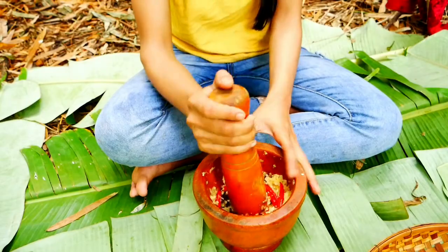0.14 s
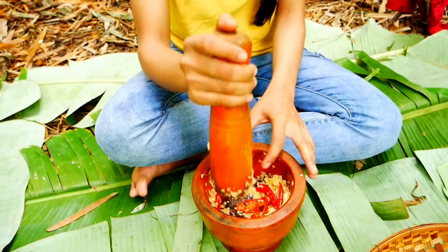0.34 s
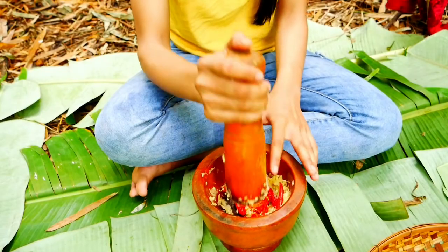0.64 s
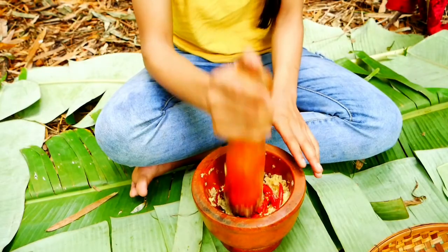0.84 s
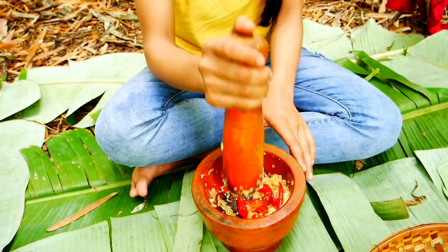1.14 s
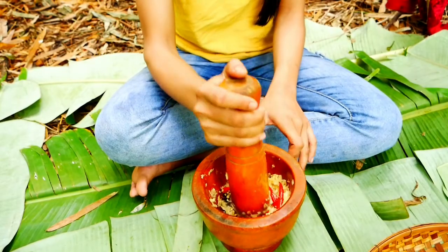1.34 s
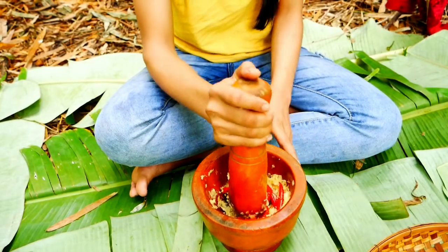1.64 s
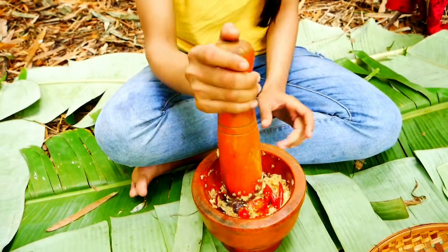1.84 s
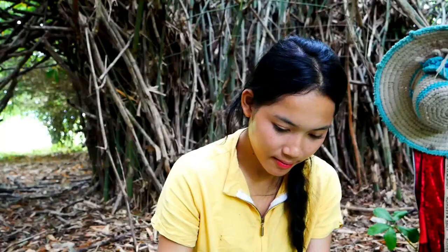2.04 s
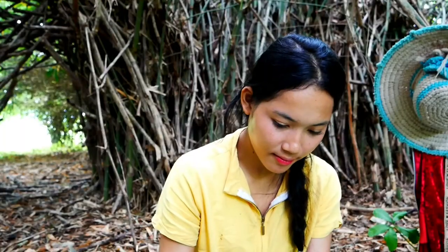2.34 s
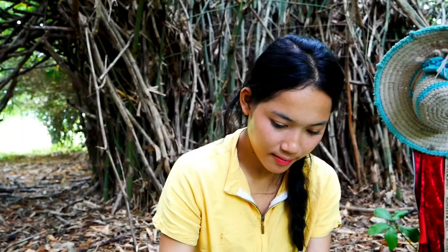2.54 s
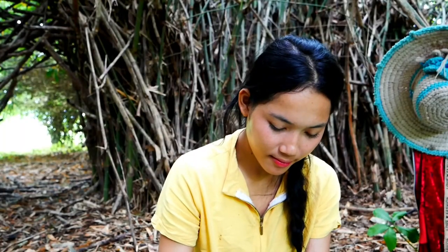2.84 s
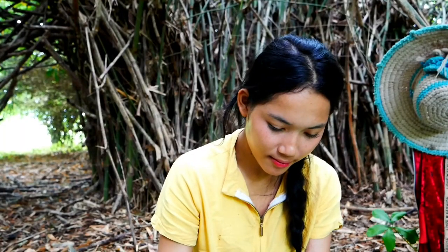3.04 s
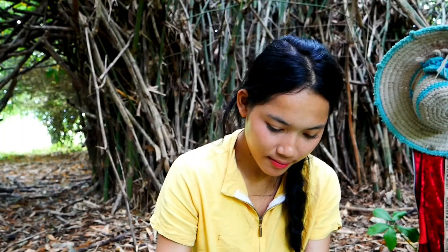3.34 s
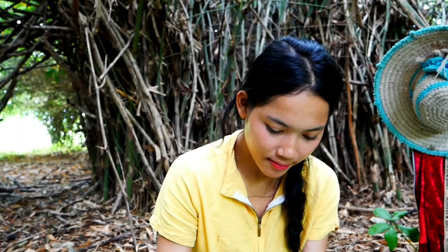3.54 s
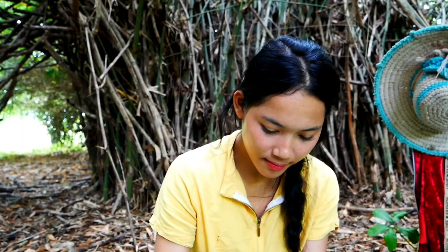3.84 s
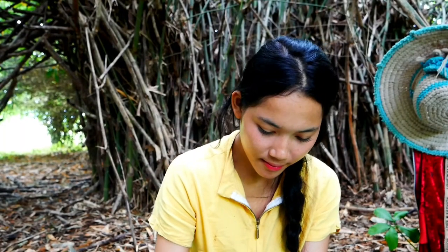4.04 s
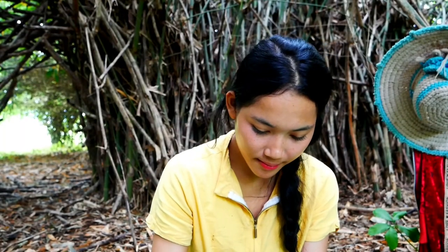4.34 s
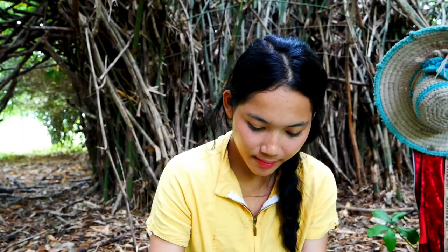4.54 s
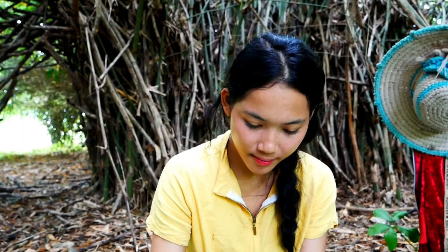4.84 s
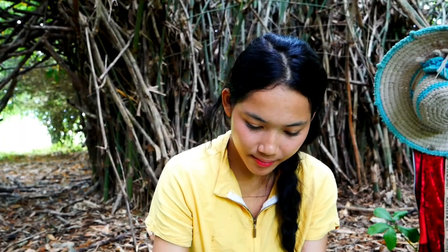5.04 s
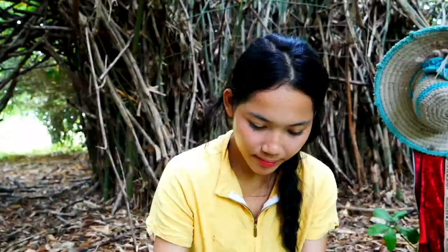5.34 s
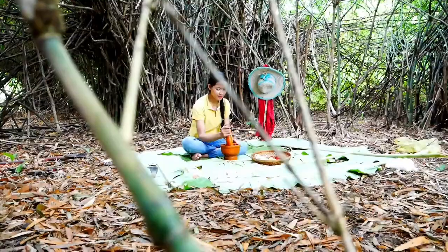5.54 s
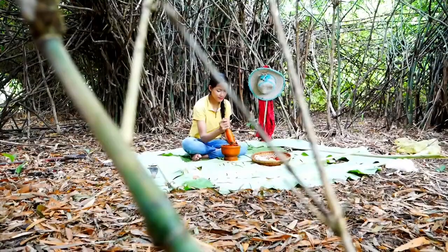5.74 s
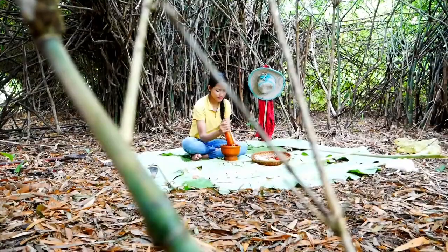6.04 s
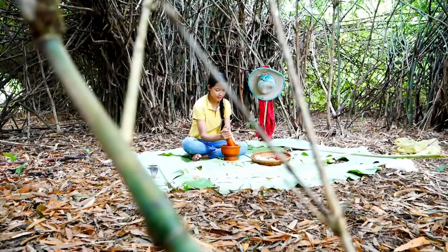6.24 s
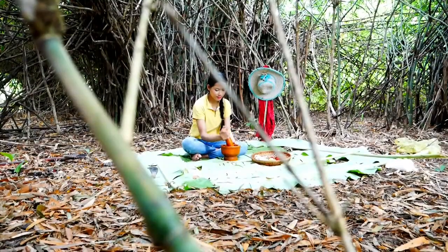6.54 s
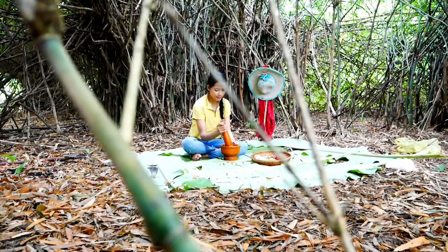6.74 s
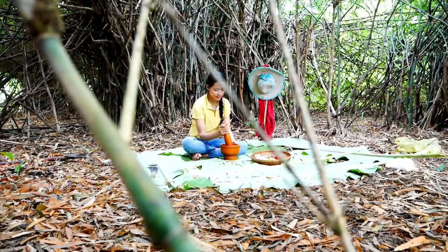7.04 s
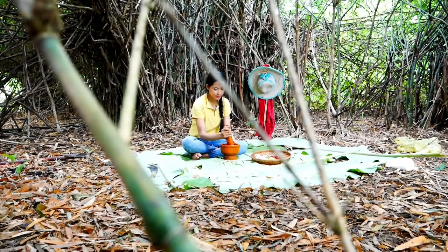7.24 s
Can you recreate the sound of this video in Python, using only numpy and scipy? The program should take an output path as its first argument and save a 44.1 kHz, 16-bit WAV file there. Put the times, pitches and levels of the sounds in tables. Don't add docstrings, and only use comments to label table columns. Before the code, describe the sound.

Close pounding of chilies in a clay mortar: soft uneven taps, then hard regular blows with little bounces, two ringing rim hits, quiet breeze.

```python
import sys
import numpy as np
from scipy import signal
from scipy.fft import rfft, irfft, next_fast_len
from scipy.io import wavfile
from scipy.ndimage import uniform_filter1d, minimum_filter1d

SR = 44100
rng = np.random.default_rng(int(sys.argv[2]) if len(sys.argv) > 2 else 0)


def gain_from_decibels(decibels):
    exponent = np.asarray(decibels, float) / 20
    return 10 ** exponent


def log_audio(samples):
    frames = np.atleast_2d(samples).T
    limited = np.clip(frames, -1, 1)
    pcm = np.round(limited * 32767).astype(np.int16)
    wavfile.write(sys.argv[1], SR, pcm)


N = 325889
LN2 = np.log(2)

# (time [s], thud level [dB], pitch [Hz], contact half-length [ms], clay wall level [dB])
BLOWS = [(0.0117, -28, 475, 3.7, -19), (0.1295, -9.5, 307, 1.36, -25), (0.2835, -23.5, 483, 1.3, -16),
         (.4802, -17.5, 391, 1.06, -38), (0.8859, 4.5, 522, 0.99, -10), (1.2357, 2, 430, 1.13, -6.5),
         (1.601, 6, 517, 0.98, -5), (1.9645, 5, 540, 1.35, -3.5), (2.1394, -7, 444, 1.1, -14.5),
         (2.44, 0.8, 490, 1.25, -15.5), (2.7652, 0.5, 444, 1.7, 2), (3.0765, -6, 516, 2.25, -14),
         (3.3803, -6, 480, 1.24, 2.5), (3.6965, 2.4, 478, 1.04, -5.5), (4.0384, -5.5, 310, 1.67, -1.9),
         (4.4034, -7, 353, 1.53, -15), (4.762, -0.2, 480, 1.23, 0), (5.1316, -5.5, 370, 1.09, -11),
         (5.4319, 0.5, 498, 0.99, -15.5), (5.8679, -10.5, 407, 1.5, -12.5), (6.2239, -9, 440, 1.4, -8),
         (6.5834, -26, 480, 1, 1.5), (6.9158, -26.5, 273, 2.9, -31), (7.2507, -26.5, 515, 1.5, -25.5)]
# (time [s], thud level [dB], pitch [Hz], contact half-length [ms], wall level [dB])
SKIDS = [(0.0231, -25, 520, 0.86, -37), (0.1413, -20.5, 310, 0.94, -44), (.2894, -31, 570, 1.3, -25),
         (0.3017, -29.5, 393, 3.2, -33), (.4956, -23.5, 237, 1.9, -46), (.5099, -26, 460, 2.3, -42),
         (0.523, -27.5, 322, 3.2, -47), (1.2409, -9.5, 493, 1.26, -34), (1.6047, -12, 412, 0.53, -14),
         (1.9696, 2.5, 477, 1.42, -2.5), (2.134, -15.5, 458, 2.2, -13.5), (2.444, -35, 460, 2.5, -12),
         (2.7694, 5, 585, 1.06, 4), (2.7784, -31, 477, 1.2, -16), (3.0846, -5.5, 378, 1.16, -10.5),
         (3.3843, -1, 416, 1.1, -13), (4.397, -33, 400, 1.3, -29), (4.412, -31, 400, 0.84, -22),
         (4.7653, -1, 547, 0.96, -7), (5.439, -29, 400, 0.7, -17), (5.8719, -13, 447, 1.1, -37),
         (6.2285, -20, 380, 3.2, -27), (6.5868, -8.5, 396, 0.99, 0), (7.263, -24, 386, 1.1, -52)]
# (time [s], thud level [dB], pitch [Hz], delay to its smaller touch [ms])
BOUNCES = [
    (0.6038, -13.5, 474, 8.1),
    (0.9604, -10, 513, 5.3),
    (1.304, -7, 494, 8),
    (1.6768, -7, 484, 8),
    (2.0398, -6.5, 490, 8),
    (4.0818, -25, 306, 8),
    (4.443, -19, 356, 8),
    (4.8016, -16.5, 375, 8),
]
# (time [s], peak level [dB], centre [Hz], time to fall 6 dB [ms], settling under peak [dB])
CRUSHED_PODS = [(0.014, -27, 2600, 2, -26), (0.126, -23.5, 4800, 3, -11.5), (0.282, -40, 2740, 6, -22),
                (0.4758, -27.5, 3914, 1, -9.5), (0.8837, -10, 4630, 1, -22),
                (1.2335, -12, 4500, 1.4, -21.5), (1.5991, -5.5, 3470, 0.5, -27),
                (1.9628, -10, 4800, 0.5, -23.5), (2.134, -20.5, 3180, 1.5, -15),
                (2.4375, -17, 2980, 2, -15), (2.7649, -3, 2900, 1.5, -31), (3.0778, -20, 3950, 2.5, -13.5),
                (3.3774, -14, 2440, 2, -16.5), (3.6983, -17.5, 3300, 0.3, -28),
                (4.0361, -21, 3280, 3, -17.5), (4.3979, -24.5, 2860, 4.5, -18.5),
                (4.7591, -15.5, 3280, 2, -17.5), (5.1323, -17.5, 3320, 2.2, -20),
                (5.4289, -21.5, 3470, 2, -14), (5.866, -21.5, 3000, 0.9, -11.5),
                (6.2235, -29.5, 3060, 1.7, -5.5), (6.5813, -9, 2640, 1.5, -26.5),
                (6.912, -40.5, 3524, 13, -3), (7.2436, -36, 4830, 3, -5)]
# (time [s], peak level [dB], centre [Hz], time to rise or fall 6 dB [ms], tip level [dB])
STRAY_PODS = [(0.493, -27.5, 5300, 2, -50), (0.506, -33, 3900, 2, -47), (2.032, -23.5, 3370, 0.7, -47),
              (2.1402, -28.5, 3240, 4.5, -19), (2.4479, -29, 4940, 3.5, -45), (3.084, -31, 3430, 4.5, -35),
              (3.391, -31, 4700, 1, -45), (3.5862, -36, 3193, 1, -34), (3.6934, -21, 3700, 1, -44),
              (3.71, -45, 3647, 2, -45), (4.0332, -22.5, 3500, 1.5, -23), (4.418, -39.5, 3393, 17, -55),
              (4.439, -31, 4125, 1, -37), (4.692, -35.5, 9500, 0.1, -60), (5.2723, -34.5, 2500, 1.9, -29),
              (5.4407, -37, 4744, 8, -55), (5.8857, -38, 4611, 1, -53), (6.2336, -39.5, 5360, 8, -50),
              (6.594, -23, 3230, -1.5, -41)]
# (frequency [Hz], level [dB per Hz])
POD_COLOUR = [(700, -17), (1500, 1), (3000, 1.5), (5000, -3), (7500, -10.5), (10000, -14.5), (12500, -40),
              (16000, -73)]
# (frequency [Hz], level [dB per Hz])
SEED_COLOUR = [(200, -15), (600, 3), (2000, -7.5), (4500, -3.5), (7500, -13.5), (10500, -11), (13000, -30),
               (16000, -50)]
# (time [s], wall pitch [Hz], wall time to fall 6 dB [ms], tip level [dB], tip pitch [Hz])
CLAY_SPOTS = [(.0092, 1310, 1.3, -18, 1550), (0.128, 868, 2.5, -36, 1700), (.281, 1193, 0.9, -12, 1560),
              (0.477, 900, -6, -35, 1880), (0.886, 930, 1.9, -15, 1700), (1.2357, 910, 1.5, -20.5, 1720),
              (1.6013, 857, 2.1, -6, 1460), (1.9631, 1193, 1.3, -4, 1370), (2.1394, 905, 1.5, -36, 1780),
              (2.4375, 892, 3, -19, 1930), (2.766, 1200, 0.5, 2.5, 1610), (3.0773, 1000, 2.5, -17, 1760),
              (3.3793, 900, 1, -8.5, 1940), (3.6951, 1025, 1.5, -14, 1460), (4.038, 1080, 1.4, -7, 1430),
              (4.4021, 940, 1.5, -28, 1960), (4.7603, 1107, 1.2, -6, 1375), (5.1322, 1000, 1.1, -10, 1900),
              (5.4302, 985, 3.5, -17, 1920), (5.8661, 1030, 1.3, -21, 2000), (6.2235, 960, 1.1, -19, 2020),
              (6.5815, 980, 2.5, -6, 1770), (6.9122, 930, 2, -45, 1900), (7.249, 920, 2.5, -44, 1900)]
# (time [s], peak level [dB], pitch [Hz], time to fall 6 dB [ms])
CHIMES = [
    (1.5986, -16, 3940, 1.5),
    (1.5974, -14, 2990, 2),
    (2.769, -9, 3530, 1),
    (3.38, -5, 1353, 2),
    (3.6968, -16, 3500, 1.5),
    (5.131, -9, 3530, 2),
    (5.431, -23, 5230, 2),
    (6.5825, -14, 2420, 2),
    (6.582, -11, 2890, 3),
    (6.5836, -22, 4500, 2),
]
# (time [s], pitch [Hz], width [Hz], level [dB], t60 [s])
RINGS = [(.009, 1900, 1450, -32.5, 0.071), (0.28, 2510, 900, -32.5, .03), (1.587, 1200, 1200, -33, .02),
         (1.632, 600, 500, -24, 0.03), (2.772, 1020, 350, -18, 0.11), (2.772, 1850, 500, -22, 0.07),
         (2.77, 4200, 2000, -26.5, 0.11), (2.79, 1360, 700, -33.5, 0.34), (3.385, 1050, 300, -27, 0.048),
         (3.70, 3445, 600, -30, 0.12), (4.764, 1110, 300, -11.5, 0.032), (5.14, 3640, 120, -39, 0.19),
         (5.432, 5150, 350, -33, 0.085), (6.585, 453, 248, -17, 0.059), (6.586, 1090, 350, -21.5, 0.23),
         (6.5866, 1900, 1200, -25.5, 0.21), (6.5861, 3130, 600, -26.5, 0.22),
         (6.585, 5300, 1790, -38, 0.25)]
# (time [s], level [dB], pitch [Hz], t60 [s])
BOWL_SWINGS = [(.1324, -22.5, 277, 0.02), (.1415, -29, 260, 0.13), (.8883, -8.5, 696, 0.028),
               (1.2389, -7, 610, 0.013), (1.6029, -9, 657, .04), (1.9731, -14, 760, 0.025),
               (2.4421, -12, 714, 0.026), (2.7703, -3, 560, .05), (2.7765, -12, 1118, 0.057),
               (3.0869, -13.5, 567, 0.026), (3.3866, -9, 600, 0.022), (3.392, -20, 897, 0.031),
               (3.6999, -9, 630, .012), (3.6966, -9, 820, .012), (3.6967, -14, 1380, .012),
               (6.224, -14, 800, .012), (4.0415, -11, 308, .015), (4.039, -7, 800, 0.028),
               (4.4062, -14.5, 483, 0.017), (4.7665, -15, 763, .03), (5.4355, -17, 566, .02),
               (6.5862, -15.5, 270, 0.056), (7.2531, -27, 570, 0.047)]
# (time [s], level [dB], pitch [Hz], t60 [s])
RIM_MODES = [(.012, -35, 910, 0.057), (.02, -38, 467, 0.18), (.03, -40, 345, .3), (.288, -36, 367, 0.18),
             (2.785, -32, 920, 0.18), (2.785, -30, 1150, 0.19), (2.785, -33, 418, 0.15),
             (2.785, -35, 632, 0.18), (3.4, -34, 950, 0.11), (2.766, -14, 1800, .04),
             (2.815, -35, 1330, .3), (2.835, -38, 1580, .25), (3.378, -17, 1950, .02),
             (6.589, -21, 974, 0.25), (6.589, -24.5, 877, .15), (6.589, -31, 1110, 0.23),
             (6.586, -26, 2982, 0.18), (6.586, -30, 3386, .2), (6.584, -30, 4820, 0.11),
             (6.583, -33, 6100, .12)]
# (frequency [Hz], t60 [s])
GROVE_DECAY = [(150, 0.14), (500, 0.037), (1500, 0.11), (5000, 0.12), (12000, 0.11)]
# (time [s], level [dB])
LEAF_LEVEL = [(0, -46.5), (.3, -47.5), (1, -47.5), (2.02, -44.5), (2.14, -52.5), (3.02, -52), (3.9, -53),
              (4.7, -51.5), (5.1, -52.5), (5.42, -51), (5.62, -45.5), (6.8, -46), (7.39, -48)]
# (frequency [Hz], level [dB per Hz])
LEAF_COLOUR = [(100, -90), (300, -19), (800, -4.5), (1500, -1.5), (4200, -1), (6000, -5.5), (7600, -12),
               (10800, -13.5), (12000, -23.5), (13500, -27), (15000, -36), (17000, -120)]
# (frequency [Hz], level [dB per Hz])
RUMBLE_COLOUR = [(25, -11), (60, -1.5), (130, 1), (300, 0), (600, -4.5), (1200, -12), (2500, -18.5),
                 (5000, -31), (9000, -120)]
# (frequency [Hz], threshold over mid-band background [dB])
TREBLE_THRESHOLD = [(4000, -36), (6000, -21), (8000, -22), (10000, -43), (12500, -26), (16000, -19)]


def unit(x):
    return x / np.sqrt(np.mean(x ** 2) + 1e-20)


def along(points, hz):
    f, v = np.transpose(points)
    return np.interp(np.log(hz + 1), np.log(f + 1), v)


def filtered(x, response):
    m = next_fast_len(x.shape[-1] + 1024)
    spectrum = rfft(x, m) * response(np.fft.rfftfreq(m, 1 / SR))
    return irfft(spectrum, m)[..., :x.shape[-1]]


def resonance(hz, width_hz):
    return lambda f: 1j * f * width_hz / (hz * hz - f * f + 1j * f * width_hz)


def blank(channels):
    return np.zeros((channels, N + 2 * SR))


def add(track, s, burst, lead):
    at = round(s * SR) - lead + SR
    track[..., at:at + burst.shape[-1]] += burst


def pair(size, spread):
    mid, side = rng.standard_normal((2, size))
    return np.array([mid + spread * side, mid - spread * side])


def swell(t, rise_ms, fall_ms):
    return np.exp(-LN2 * 1000 * np.where(t < 0, -t / rise_ms, t / fall_ms))


def landings():
    bounce_half_ms, bounce_wall_db = 1.17, -13.5
    rebound_db, rebound_pitch, rebound_half_ms = -11.5, 0.76, 1.65
    bounces = []
    rebounds = []
    for s, db, hz, delay_ms in BOUNCES:
        bounces.append((s, db, hz, bounce_half_ms, db + bounce_wall_db))
        if db > -15:
            rebounds.append((s + delay_ms / 1000, db + rebound_db, hz * rebound_pitch, rebound_half_ms,
                             db + bounce_wall_db + rebound_db))
    return BLOWS + SKIDS + bounces + rebounds


def thuds():
    track, t = blank(channels=1), np.arange(-440, 1320) / SR
    for s, db, hz, half_ms, _ in landings():
        late = t - .0001
        width_ms = half_ms * np.where(late < 0, .85, 1.15)
        bell = np.exp(-LN2 * (1000 * late / width_ms) ** 2)
        cycles = hz * t * (1 - 40 * np.clip(t, -.004, .004))
        overhang = 0.054 * swell(t - .002, 1.0, 2.1)
        push = (bell + overhang) * np.cos(2 * np.pi * cycles)
        jolt = gain_from_decibels(-8 + 0.037 * db) * swell(t - .0012, 0.95, 1.07) * np.cos(2 * np.pi * 205 * (t - .0003))
        add(track, s, -gain_from_decibels(db) * (push + jolt), lead=440)
    return track[0, SR:SR + N]


def pods():
    under = []
    for s, db, hz, fall_ms, settle_db in CRUSHED_PODS:
        rise_ms = -1.06 + 0.06 * db + 0.5 * hz / 1000
        under.append((s, db, hz, rise_ms, fall_ms, settle_db))
    return under + [(s, db, hz, ms, ms, -18.5) for s, db, hz, ms, _ in STRAY_PODS]


def crushes():
    track, t = blank(channels=2), np.arange(-1320, 5000) / SR
    for s, db, hz, rise_ms, fall_ms, settle_db in pods():
        clumps = unit(uniform_filter1d(rng.standard_normal((2, len(t))), size=12))

        def pod_colour(f):
            return gain_from_decibels(along(POD_COLOUR, f * (3600 / hz) ** 0.9)) * (.5 + np.abs(resonance(hz, .3 * hz)(f)))

        crackle = unit(filtered(gain_from_decibels(2.8 * clumps[0]) * pair(len(t), 0.15), pod_colour))
        rattle = gain_from_decibels(4.5 * clumps[1]) * pair(len(t), 0.25)
        rattle = unit(filtered(rattle, lambda f: gain_from_decibels(along(SEED_COLOUR, f))))
        sinking = gain_from_decibels(db - 0.94) * swell(t, max(rise_ms, .3), max(fall_ms, .3))
        settling = gain_from_decibels(db + settle_db) * swell(t - .006, 4.0, 21.1)
        add(track, s, sinking * crackle + settling * rattle, lead=1320)
    return track[:, SR:SR + N]


def wall():
    lead_s = 0.0015
    struck = [(s, blow[-1], hz, fall_ms) for blow, (s, hz, fall_ms, *_) in zip(BLOWS, CLAY_SPOTS)]
    touched = [(s - lead_s, db, 1040 + 9.5 * db, 1.1 + 0.1 * db) for s, *_, db in landings()[len(BLOWS):]]
    return struck + touched


def bowl():
    lead_s, fall_ms = 0.0011, 0.66
    contacts = []
    for s, db, _, _, wall_db in landings():
        level_db = -8 + 0.31 * db + 0.67 * wall_db
        contacts.append((s - lead_s, level_db, 776 + 7.5 * (wall_db - db), fall_ms))
    return contacts


def tip():
    lead_s, stray_hz, fall_ms = 0.00046, 1900, 0.77
    taps = [(s - lead_s, db, hz, fall_ms) for s, *_, db, hz in CLAY_SPOTS]
    stray_taps = [(s, db, stray_hz, fall_ms) for s, *_, db in STRAY_PODS]
    return taps + stray_taps + CHIMES


def knocks(contacts, rise_ms, scatter):
    track, t = blank(channels=1), np.arange(-440, 1760) / SR
    thud_s = np.transpose(landings())[0]
    chances = rng.uniform(-np.pi, np.pi, (len(contacts), 1))
    for (s, db, hz, fall_ms), chance in zip(contacts, chances):
        after = s - thud_s[np.argmin(np.abs(thud_s - s))]
        onset = swell(t, rise_ms, 1) ** (1 - 400 * t)
        shape = np.where(t < 0, onset, swell(t, 1, max(fall_ms, .3)))
        cycles = np.cos(2 * np.pi * hz * (t + after) + scatter * chance)
        add(track, s, -gain_from_decibels(db) * shape * cycles, lead=440)
    return track[0, SR:SR + N]


def swings(modes, wander):
    track, t = blank(channels=1), np.arange(-220, 12000) / SR
    for s, db, hz, t60 in modes:
        stray = np.cumsum(wander * rng.standard_normal(len(t))) if wander else 0
        tone = np.cos(2 * np.pi * hz * t + stray)
        add(track, s, -gain_from_decibels(db) * swell(t, 150 / hz, 100 * t60) * tone, lead=220)
    return track[0, SR:SR + N]


def rings():
    track, t = blank(channels=2), np.arange(-440, 8000) / SR
    for s, hz, width_hz, db, t60 in RINGS:
        narrow, wide = resonance(hz, width_hz), resonance(hz, 2.5 * width_hz)
        tone = unit(filtered(pair(len(t), 0.47), lambda f: narrow(f) * wide(f)))
        add(track, s, gain_from_decibels(db) * swell(t, 0.92, 100 * t60) * tone, lead=440)
    return track[:, SR:SR + N]


def grove(x):
    track, span = blank(channels=2), SR // 3
    for start in range(0, N, span):
        hz, t, z = signal.stft(pair(SR // 6, 0.53), SR, nperseg=256)
        decay = gain_from_decibels(-60 * t / along(GROVE_DECAY, hz)[:, None])
        tail = signal.istft(z * decay, SR, nperseg=256)[1]
        tail = tail / np.linalg.norm(tail[0])
        wet = signal.fftconvolve(x[None, start:start + span], tail, axes=1)
        add(track, start / SR + 0.005096, wet, lead=0)
    return track[:, SR:SR + N]


def patchy(spectrum, spread, patchy_db):
    z = signal.stft(pair(N + 512, spread), nperseg=512)[2]
    field = uniform_filter1d(rng.standard_normal(z.shape[1:]), size=6, axis=0)
    field = uniform_filter1d(field, size=12, axis=1)
    noise = signal.istft(z * gain_from_decibels(patchy_db * unit(field)), nperseg=512)[1][:, :N]
    return unit(filtered(noise, lambda hz: gain_from_decibels(along(spectrum, hz))))


def air():
    leaves_db = np.interp(np.arange(N) / SR, *np.transpose(LEAF_LEVEL))
    rumble_db = -46.5 + 0.074 * (leaves_db - leaves_db.mean())
    rumble = gain_from_decibels(rumble_db) * patchy(RUMBLE_COLOUR, 1.16, patchy_db=2.0)
    leaves = gain_from_decibels(leaves_db + 0.28) * patchy(LEAF_COLOUR, 0.25, patchy_db=0.66)
    return rumble + leaves


def scene():
    clay = knocks(wall(), rise_ms=0.31, scatter=0.61) + gain_from_decibels(4.0) * knocks(bowl(), rise_ms=0.4, scatter=0.2)
    taps = knocks(tip(), rise_ms=0.081, scatter=0.72)
    body = thuds() + clay + taps + swings(BOWL_SWINGS, wander=0)
    ringing = rings() + swings(RIM_MODES, wander=0.045)
    return body + gain_from_decibels(-15.0) * grove(body) + crushes() + ringing + air()


def gated(x, flicker_db):
    hz, _, z = signal.stft([x[0] + x[1], x[0] - x[1]], SR, nperseg=1024)
    bands = (np.abs(z[:, 1:]) ** 2).reshape(2, 64, 8, -1).mean(axis=2)
    middle = uniform_filter1d(bands[0, 4:20].mean(axis=0), size=5)
    background = minimum_filter1d(middle, size=25)
    flicker = flicker_db * uniform_filter1d(rng.standard_normal(bands.shape), size=2)
    threshold = gain_from_decibels(along(TREBLE_THRESHOLD, hz[4::8])[:, None] + flicker) ** 2
    z[:, 1:] *= (bands > background * threshold).repeat(8, axis=1)
    mid, side = signal.istft(z, SR, nperseg=1024)[1][:, :N] / 2
    return np.array([mid + side, mid - side])


def roll_off(x):
    return signal.sosfilt(signal.butter(12, 16460, fs=SR, output="sos"), x)


def record(dry):
    x = filtered(dry, lambda f: (1j * f / (95 + 1j * f)) ** 2)
    x = x / (1 + np.abs(x / .94) ** 10) ** (1 / 10)

    def treble(f):
        gap = 1 - np.exp(-((f - 7870) / 60) ** 4)
        return gap / (1 + (f / 14800) ** 24)

    mix = gated(filtered(x, treble), flicker_db=10.0)
    return roll_off(mix)


dry = scene()
out = record(dry)
log_audio(out)
```